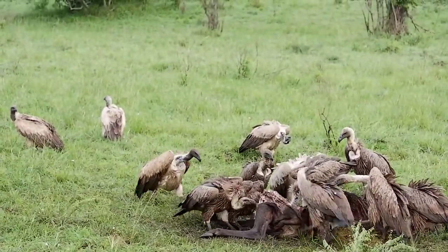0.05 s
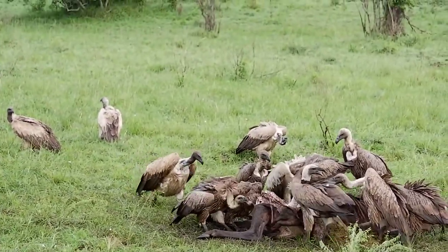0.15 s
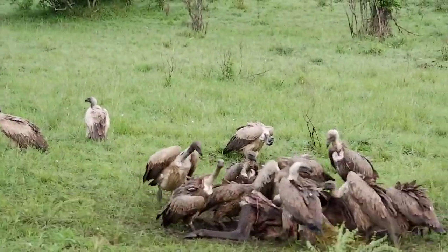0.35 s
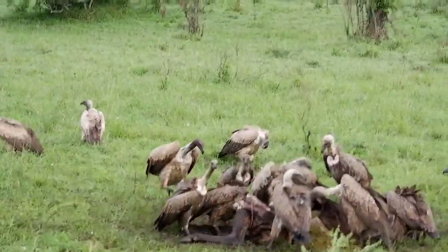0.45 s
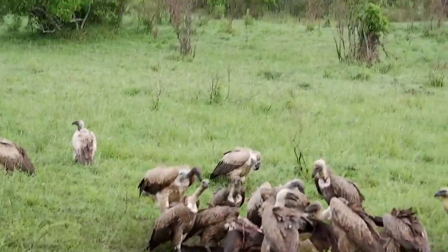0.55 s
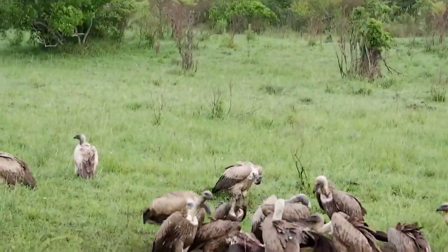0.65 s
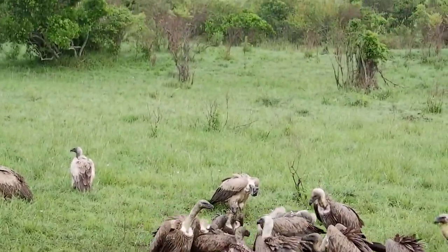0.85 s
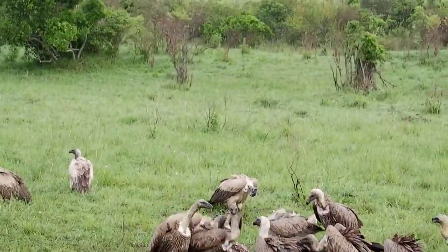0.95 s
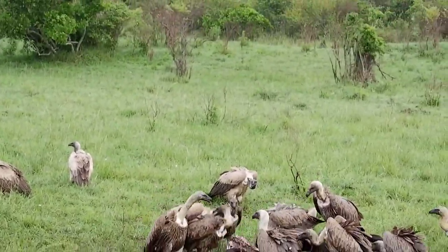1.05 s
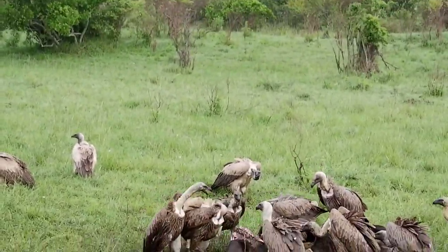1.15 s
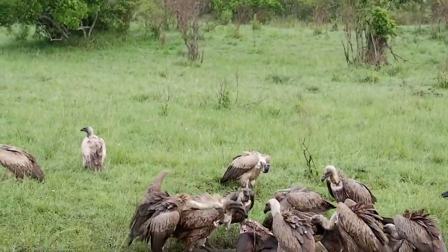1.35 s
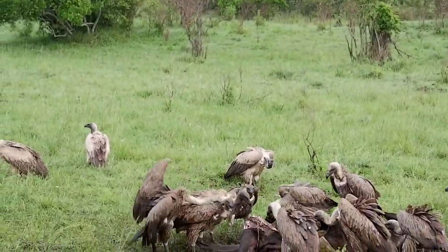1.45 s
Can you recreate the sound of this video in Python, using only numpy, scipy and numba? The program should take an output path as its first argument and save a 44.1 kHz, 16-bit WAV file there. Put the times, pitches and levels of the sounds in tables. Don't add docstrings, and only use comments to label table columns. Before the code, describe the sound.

Vultures hiss and rasp harshly over a carcass, with one sharp knock close to the microphone

```python
import sys
import numpy as np
from scipy import signal
from scipy.fft import rfft, irfft
from scipy.io import wavfile
from scipy.ndimage import uniform_filter1d
from numba import njit

SR = 44100
rng = np.random.default_rng(int(sys.argv[2]) if len(sys.argv) > 2 else 0)


def gain_from_db(level_db):
    decades = np.asarray(level_db, float) / 20
    return 10 ** decades


def store_pcm(level_fs):
    pcm = np.round(np.clip(level_fs, -1, 1) * 32767).astype(np.int16)
    wavfile.write(sys.argv[1], SR, np.atleast_2d(pcm).T)


N = 66150


@njit
def svf(x, hz, width):
    y, band, low = np.empty(len(x)), 0., 0.
    for i in range(len(x)):
        g = np.tan(np.pi * hz[i] / SR)
        damping = width / hz[i]
        v = (band + g * (x[i] - low)) / (1 + g * (g + damping))
        band = 2 * v - band
        low += 2 * g * v
        y[i] = damping * v
    return y


def unit(x):
    return x / np.sqrt(np.mean(x ** 2))


def over_time(rows):
    return np.interp(np.arange(N) / SR, *np.array(rows).T)


def curve(rows):
    return gain_from_db(over_time(rows))


def walk(rate_hz):
    hold = int(SR / rate_hz)
    steps = np.repeat(rng.standard_normal(N // 20)[:N // hold + 1], hold)
    slewed = uniform_filter1d(uniform_filter1d(steps, hold), hold)
    return unit(slewed[:N])


def colour(points):
    hz, db = np.array(points).T
    f = np.maximum(np.arange(N // 2 + 1) * SR / N, 1)
    gain = gain_from_db(np.interp(np.log(f), np.log(hz), db))
    return unit(irfft(rfft(rng.standard_normal(N)) * gain, N))


def ring(start_s, hz, swell_ms, sag_hz_per_s=0):
    out, first = np.zeros(N), int(start_s * SR) + 1
    t = np.arange(first, min(first + 2048, N)) / SR - start_s
    u = t * 1000 / swell_ms
    swell = (u * np.exp(1 - u)) ** 3
    out[first:first + 2048] = swell * np.sin(2 * np.pi * (hz + sag_hz_per_s * t / 2) * t)
    return out


def mid_side(mid, side):
    return mid + side * np.array([[1], [-1]])


def vulture(throat, effort, rasp_db, rasp_hz, patchy_db, drift, pan_db, scatter_db, bright, neck=1):
    air = rng.standard_normal(N) * gain_from_db(rasp_db * walk(rasp_hz))
    push = curve(effort)
    slack_db = 20 * np.log10(np.maximum(push / push.max(), .05))
    neck = neck + drift * walk(6.26)
    hiss = 0
    for k, (hz, width_hz, db) in enumerate(throat):
        centre_hz, pole_hz = hz * neck, 1.71 * width_hz
        band = svf(svf(air, centre_hz, pole_hz), centre_hz, pole_hz) / np.sqrt(width_hz / 200)
        dull_db = slack_db * bright * max(np.log2(hz / 2500), 0)
        hiss = hiss + (-1) ** k * band * gain_from_db(db + patchy_db * walk(25.06) + dull_db)
    hiss = unit(hiss) * push

    t = np.arange(2048) / SR
    echo = rng.standard_normal(2048) * np.exp(-t / 0.0074)
    side = signal.fftconvolve(hiss, echo / np.sqrt(np.sum(echo ** 2)))[:N]
    side = side + 2.0 * signal.lfilter(*signal.butter(2, 4800, "high", fs=SR), side)
    return mid_side(hiss * gain_from_db(np.array([[pan_db], [-pan_db]]) / 2), gain_from_db(scatter_db) * side)


def near_bird():
    # resonance in Hz, width in Hz, level in dB
    throat = [(623, 140, -31.5), (1446, 118, -3.5), (1656, 73, -6), (1895, 170, -2), (2078, 99, 0.5),
              (2250, 315, -1.5), (2574, 250, 1), (3190, 560, -9), (3735, 90, -12), (4024, 95, -6.5),
              (4450, 340, -8.5), (5520, 370, -14), (7450, 1500, -24), (9340, 630, -23.5)]
    # time in seconds, breath level in dB
    effort = [(0.199, -48.5), (.24, -34), (0.262, -29.5), (0.309, -24), (.35, -25), (.39, -30),
              (0.413, -29), (.435, -45), (.5, -51)]
    return vulture(throat, effort, rasp_db=0.0, rasp_hz=170, patchy_db=0.86, drift=0.0044,
                   pan_db=1.8, scatter_db=-18.0, bright=0.075)


def second_bird():
    # resonance in Hz, width in Hz, level in dB
    throat = [(971, 95, -19.5), (1421.5, 68, -7.5), (1651, 28, -9.5), (1892, 210, -5.5), (2281, 133, -2),
              (2567, 264, -7.5), (3720, 89, -18), (3933, 74, -19.5), (4230, 200, -14), (5620, 1100, -24),
              (7480, 1200, -26.5), (8960, 790, -25)]
    # time in seconds, breath level in dB
    effort = [(.2, -44), (.24, -33.5), (.4, -30), (.47, -34), (.58, -36), (.62, -32.5), (0.702, -31),
              (.73, -35.5), (.78, -54.5)]
    return vulture(throat, effort, rasp_db=-0.5, rasp_hz=100, patchy_db=1.47, drift=0.0046,
                   pan_db=0.0, scatter_db=-19, bright=0.55)


def third_bird():
    # resonance in Hz, width in Hz, level in dB
    throat = [(920, 320, -10.5), (1672, 67, -2), (1930, 200, -6.5), (2238, 63, 0.5), (2730, 70, -1.5),
              (3916, 120, -11.5), (4490, 380, -9.5), (5570, 560, -18), (7250, 1400, -18)]
    # time in seconds, breath level in dB
    effort = [(.68, -50), (.715, -39), (.8, -37.5), (.85, -38), (.88, -43), (.892, -51), (.93, -51)]
    return vulture(throat, effort, rasp_db=2.5, rasp_hz=150, patchy_db=0.5, drift=0.0026,
                   pan_db=1.6, scatter_db=-23, bright=0.071)


def low_bird():
    # resonance in Hz, width in Hz, level in dB
    throat = [(1230, 180, -9), (1383, 94, -2), (1850, 490, -0.5)]
    # time in seconds, breath level in dB
    effort = [(.185, -83), (0.199, -38), (.25, -43.5), (.4, -44), (.55, -39), (.72, -41), (.85, -40.5),
              (.885, -50), (.91, -69)]
    # time in seconds, resonance frequency ratio
    neck_ratio = [(.19, 0.92), (.215, 0.89), (.27, 0.86), (.6, 1.004), (.72, 0.947), (.85, 0.95),
                  (.91, 0.79)]
    return vulture(throat, effort, rasp_db=0.5, rasp_hz=110, patchy_db=0.4, drift=0.0044,
                   pan_db=0.5, scatter_db=-17, bright=.1, neck=over_time(neck_ratio))


def squawks():
    # start in seconds, pitch in Hz, sag in Hz per s, peak in dB, swell in ms
    whistle_rows = [
        (.19, 1230, -4000, -41, 16),
        (.862, 1480, -8000, -38, 17),
    ]
    # start in seconds, throat resonance in Hz, peak in dB, swell in ms
    squawk_rows = [(1.241, 2150, -41, 7), (1.245, 2330, -38, 6.5), (1.247, 2620, -42, 4),
                   (1.249, 1900, -44, 4), (1.249, 1490, -44, 4.6), (1.346, 1380, -48, 7),
                   (1.354, 2620, -34.5, 5), (1.354, 2270, -38.5, 5), (1.3555, 2880, -39, 4),
                   (1.363, 2300, -42, 5), (1.492, 2500, -41, 5)]
    # start in seconds, throat resonance in Hz, peak in dB, swell in ms
    surge_rows = [(.253, 2230, -26, 6), (.268, 2700, -27, 4), (.286, 1430, -27, 7), (.3045, 2350, -19, 2),
                  (.312, 1450, -28, 5), (.344, 2300, -20, 3.5), (.362, 2150, -26, 4), (.391, 2400, -24, 4),
                  (.487, 2130, -32, 4), (.519, 1360, -35, 6), (.59, 2270, -29, 3.5), (.621, 2290, -29, 5),
                  (.675, 2230, -33, 6), (.698, 2290, -33, 5), (.712, 1330, -33, 5), (.812, 1670, -37, 6),
                  (.825, 1400, -38, 6), (.845, 2300, -37, 4), (.85, 2700, -37, 6)]
    shake = gain_from_db(2.0 * walk(500))
    out = np.zeros(N)
    for start_s, hz, sag_hz_per_s, db, swell_ms in whistle_rows:
        out += gain_from_db(db) * shake * ring(start_s, hz, swell_ms, sag_hz_per_s)
    for k, (start_s, hz, db, swell_ms) in enumerate([*squawk_rows, *surge_rows]):
        out += gain_from_db(db) * np.roll(shake, 999 * k) * ring(start_s, hz, swell_ms)
    return out


def crowd():
    # resonance in Hz, width in Hz, level in dB
    throat = [(1399, 110, -0.5), (1600, 240, -8), (1884, 64, -10), (2306, 95, -5), (2647, 170, -1.5),
              (3056, 310, -4), (4290, 300, -9.5), (4750, 320, -7.5), (5300, 200, -13), (6020, 800, -13)]
    # time in seconds, breath level in dB
    effort = [(0, -43), (0.102, -43), (0.179, -41.5), (.4, -43.5), (.6, -38), (.93, -43), (1.1, -44),
              (1.2, -45.5), (1.25, -44.5), (1.28, -46.5), (1.32, -53), (1.35, -48), (1.41, -50.5),
              (1.46, -55), (1.5, -49)]
    hiss = vulture(throat, effort, rasp_db=1.0, rasp_hz=100, patchy_db=.9, drift=0.0012,
                   pan_db=0.7, scatter_db=-24, bright=0.019)
    return signal.sosfilt(signal.butter(4, 1330, "high", fs=SR, output="sos"), hiss)


def knock():
    # pitch in Hz, left level in dB, right level in dB, swell in ms, arrival in ms
    case_modes = [(181, -53, -38, 5, 0.16), (780, -38.5, -35, 2.7, 0.82), (1210, -34, -38, 4.5, 0.54),
                  (2320, -28, -22, 1.4, 0.32), (3130, -16.5, -7, 1.03, 0.13), (4080, -21, -21, 1.53, 0.126),
                  (4384, -16, -13.5, 1.2, 0.11), (5790, -32, -19, 1.04, 0.094),
                  (6244, -33, -22, 0.95, 0.13), (7250, -13.5, -14.5, 0.85, 0.084),
                  (7800, -35, -14.5, 0.6, 0.048), (8830, -31, -30, 0.83, 0.052),
                  (9270, -16.5, -15.5, 0.55, 0.035), (12500, -38, -33, 0.22, 0.3)]
    knock_s, left_lag_ms = .4208, -0.028
    rattle_db, rattle_t60_s = -24, .022
    out = np.zeros((2, N))
    for hz, left_db, right_db, swell_ms, late_ms in case_modes:
        start_s = knock_s + late_ms / 1000
        out[0] += gain_from_db(left_db) * ring(start_s + left_lag_ms / 1000, hz, swell_ms)
        out[1] += gain_from_db(right_db) * ring(start_s, hz, swell_ms)
    t = np.arange(N) / SR - knock_s - .002
    fade = (t > 0) * gain_from_db(rattle_db - 60 * np.maximum(t, 0) / rattle_t60_s)
    rattle_spectrum = [(2000, -35), (3000, 7), (4500, -5), (7000, -7.5), (11000, -36)]  # (Hz, dB)
    return out + fade * np.array([colour(rattle_spectrum) for _ in range(2)])


def taps():
    # start in seconds, pitch in Hz, peak in dB, swell in ms, lateness of the right port in ms
    tap_rows = [(0.503, 194, -49, 12, .01), (0.622, 219, -51, 6.7, .01), (.903, 780, -41.5, 3.8, .01),
                (1.165, 233, -45.5, 6.3, 0.0079), (1.18, 420, -52, 9, .01),
                (1.224, 3400, -37.5, 2.5, 0.091), (1.245, 298, -47, 4, .01), (1.253, 804, -44, 4.2, 0.0085),
                (1.263, 1180, -41, 2, 0.011), (1.318, 209, -52, 14, .01), (1.393, 240.4, -52, 7, .01),
                (1.432, 220, -55, 8, .01), (1.486, 271, -51, 6, .01)]
    out = np.zeros((2, N))
    for start_s, hz, db, swell_ms, late_ms in tap_rows:
        out[0] += gain_from_db(db) * ring(start_s, hz, swell_ms)
        out[1] += gain_from_db(db) * ring(start_s + late_ms / 1000, hz, swell_ms)
    return out


def breeze():
    # frequency in Hz, level in dB per Hz
    rumble_spectrum = [(30, -34), (60, -25), (120, -7), (200, 2), (300, -5), (450, -3.5), (900, -11.5),
                       (2000, -27.5)]
    # time in seconds, level in dB
    gust = [(0, 3.5), (.1, 0.5), (.25, 1), (.45, 1.5), (.6, 1.5), (.85, -5), (1.0, -5), (1.12, -1.5),
            (1.18, 5), (1.3, 1.5), (1.5, 0.5)]
    # frequency in Hz, level in dB per Hz
    buffet_spectrum = [(25, -17), (50, 8), (90, 2), (140, 0), (250, -37)]
    # time in seconds, level in dB
    buffet_gust = [(0, -68), (.09, -72), (.17, -70), (.21, -79), (.26, -77), (.34, -62), (.45, -66.5),
                   (.6, -73), (.7, -83), (.8, -71), (.9, -66.5), (1.04, -61.5), (1.16, -69), (1.29, -62.5),
                   (1.38, -74), (1.46, -61.5)]
    alike = 0.5

    def wind():
        rumble = colour(rumble_spectrum) * gain_from_db(1.3 * walk(13.9)) * curve(gust) * gain_from_db(-57)
        return rumble + colour(buffet_spectrum) * curve(buffet_gust)

    return mid_side(np.sqrt((1 + alike) / 2) * wind(), np.sqrt((1 - alike) / 2) * wind())


def preamp_hiss():
    # frequency in Hz, level in dB
    spectrum = [(60, -8), (300, 4), (3000, 8.5), (8000, -1.5), (11000, -4), (13500, -1.5), (15000, -5),
                (16000, 1)]
    creep_db_per_s = -1
    level_db = -52.5 + creep_db_per_s * np.abs(np.arange(N) / SR - .45)
    return gain_from_db(level_db) * mid_side(colour(spectrum), gain_from_db(-0.5) * colour(spectrum))


def scene():
    birds = near_bird() + second_bird() + third_bird() + low_bird() + crowd() + squawks()
    return birds + knock() + taps() + breeze()


def band_limit(x):
    return signal.sosfilt(signal.butter(12, 16260, fs=SR, output="sos"), x)


def record(dry):
    low_cut_hz, top_hz = 45, 15800
    f = np.arange(N // 2 + 1) * SR / N
    response = (f < top_hz) * f / np.hypot(f, low_cut_hz)
    mix = irfft(rfft(dry + preamp_hiss()) * response, N)
    return band_limit(mix)


dry = scene()
out = record(dry)
store_pcm(out)
```